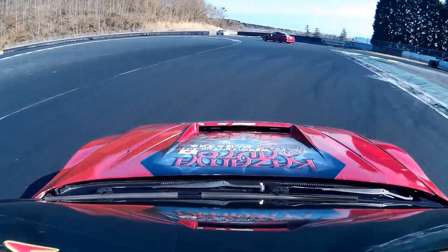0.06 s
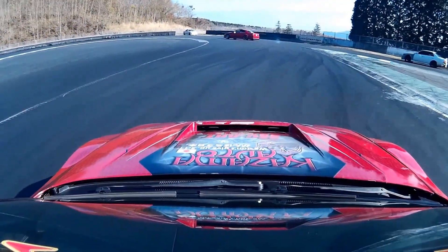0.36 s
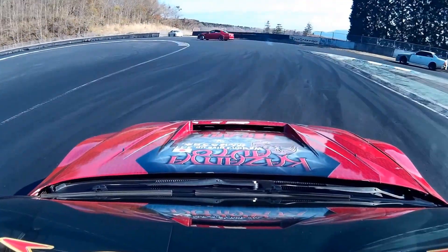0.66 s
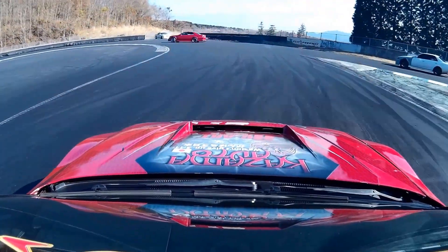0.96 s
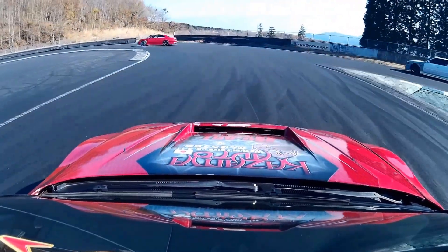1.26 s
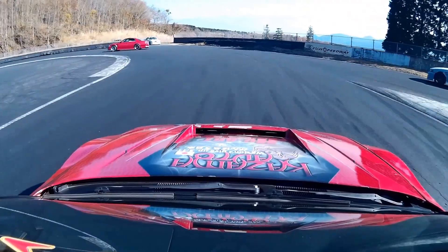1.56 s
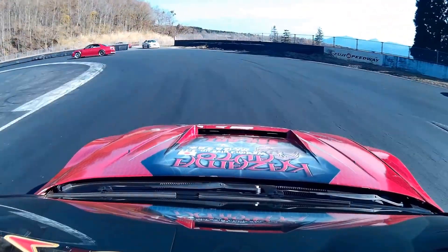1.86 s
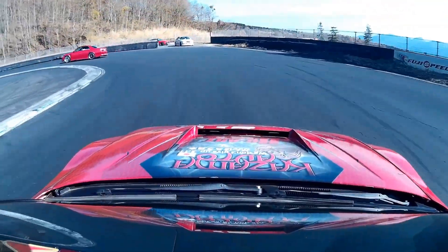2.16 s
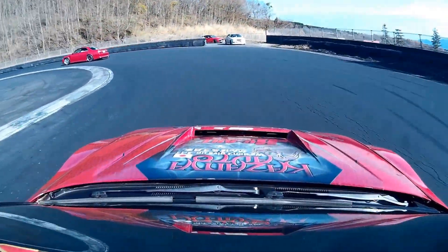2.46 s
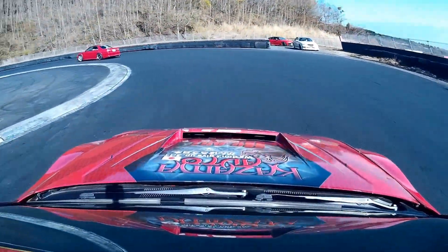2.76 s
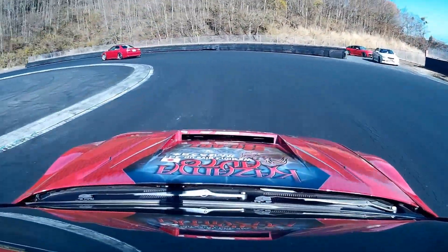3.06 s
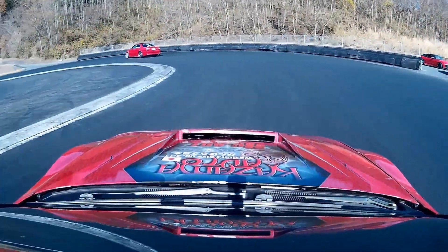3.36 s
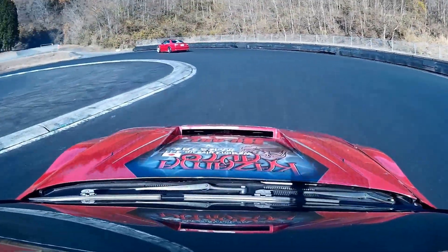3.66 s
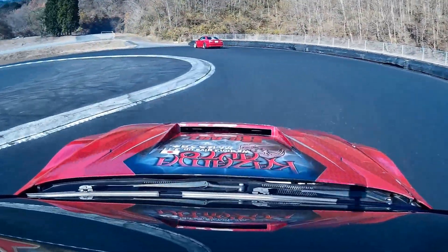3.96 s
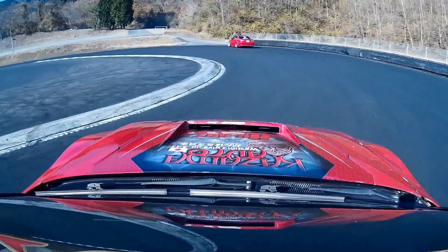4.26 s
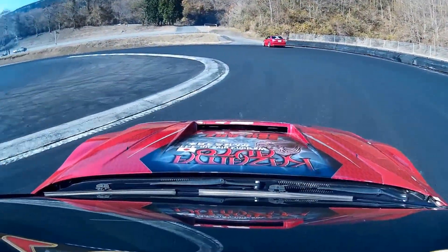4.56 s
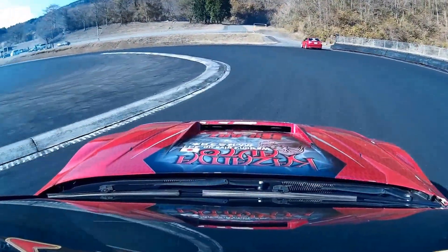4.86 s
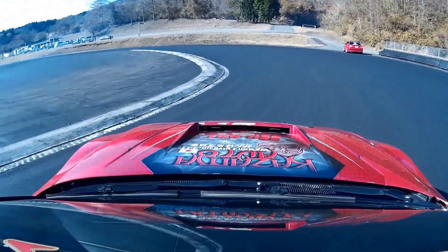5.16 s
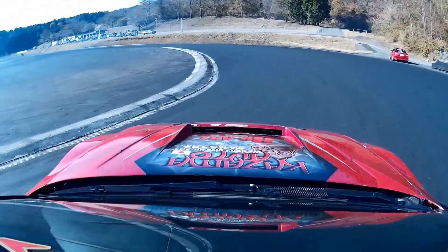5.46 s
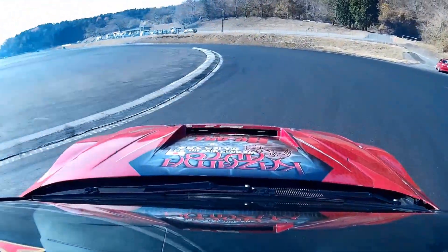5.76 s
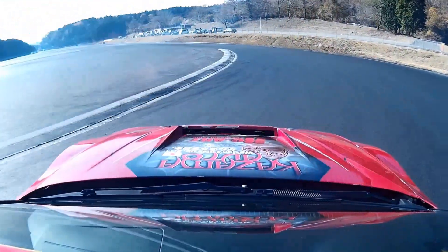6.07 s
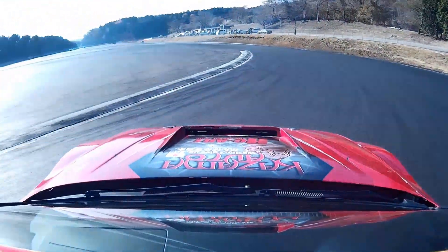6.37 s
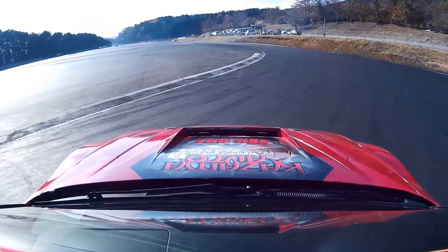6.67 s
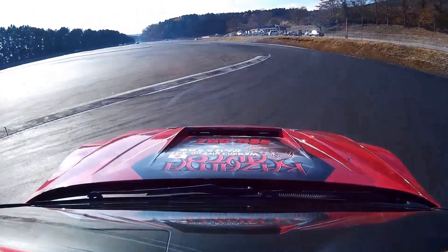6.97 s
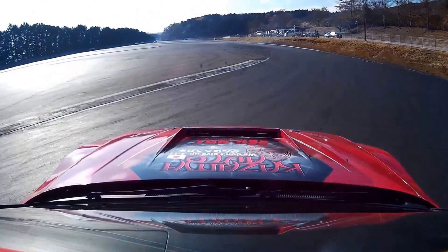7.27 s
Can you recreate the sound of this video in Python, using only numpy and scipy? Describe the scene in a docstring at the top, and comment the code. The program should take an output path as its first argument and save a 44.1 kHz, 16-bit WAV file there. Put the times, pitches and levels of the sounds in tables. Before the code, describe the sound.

From a microphone on the roof of a drifting car, a loud engine growls under rushing, thumping wind. The gusts peak and drop away, leaving the wavering exhaust note, sliding tyres and the brief drone of a second car further along the track. Grit ticks close by now and then. After a short lift with a soft turbo flutter, the engine runs up to high revs and barks at the limiter with a thin whistle.

```python
"""Drifting straight-six, from the roof

A turbocharged car drifts through a long bend, microphone on its roof. Wind beats on the microphone
until the car turns sideways; then the exhaust and scrubbing tyres stand out. The turbo flutters as the
throttle lifts and whistles as the engine runs up to its rev limit. Another car drones further ahead,
grit ticks on the body close by, and the loudest gusts overload the microphone."""
import sys
import numpy as np
from scipy.fft import rfft, irfft, next_fast_len
from scipy.io import wavfile
from scipy.ndimage import uniform_filter1d, map_coordinates

SR = 44100
rng = np.random.default_rng(int(sys.argv[2]) if len(sys.argv) > 2 else 0)


def to_wav(sig):
    """Store sig (one row per channel, or 1-D mono) as 16-bit WAV at the path in sys.argv[1].

    Samples outside -1..1 are clipped; the rate is SR.
    """
    pcm = np.clip(np.atleast_2d(sig), -1, 1) * 32767
    pcm = np.round(pcm).astype(np.int16)
    wavfile.write(sys.argv[1], SR, pcm.T)  # frames by channels


N = 322371
TIME_S = np.arange(N) / SR
STRONG_HARMONICS = 5  # of the firing rate


def amp(db):
    """Decibels to gain."""
    return 10 ** (np.asarray(db) / 20)


def unit(x):
    """Scale to rms 1."""
    return x / np.sqrt(np.mean(x ** 2) + 1e-20)


def along(points, hz):
    """Read (Hz, value) points on a log frequency axis."""
    point_hz, values = np.transpose(points)
    return np.interp(np.log(hz + 1), np.log(point_hz + 1), values)


def curves(rows):
    """One value per sample for each column after the time."""
    times, *columns = np.transpose(rows)
    return [np.interp(TIME_S, times, column) for column in columns]


def during(rows):
    """1 while a table lasts, with soft edges."""
    active = (TIME_S >= rows[0][0]) & (TIME_S <= rows[-1][0])
    return uniform_filter1d(active * 1., size=2000)


def swell(centre_s, width_s):
    """A bell-shaped burst of height 1."""
    return np.exp(-.5 * np.minimum(((TIME_S - centre_s) / width_s) ** 2, 100))


def spell(start_s, end_s, rise_s=0.013, fall_s=0.061):
    """1 between two times, with ramps as long as the throttle's travel."""
    return np.clip(np.minimum((TIME_S - start_s) / rise_s, (end_s - TIME_S) / fall_s) + .5, 0, 1)


def wobble(rate):
    """A smooth random curve of rms near 1, with rate knots a second."""
    knots = rng.standard_normal(4096)
    coarse = np.arange(0, N, step=32)
    return np.interp(np.arange(N), coarse, map_coordinates(knots, [coarse * rate / SR], mode="wrap"))


def filtered(x, response):
    """Filter x by a gain given as a function of frequency."""
    size = next_fast_len(N + SR // 4)
    return irfft(rfft(x, size) * response(np.fft.rfftfreq(size, 1 / SR)), size)[:N]


def noise(spectrum):
    """Coloured noise of rms 1."""
    return unit(filtered(rng.standard_normal(N), lambda hz: amp(along(spectrum, hz))))


def angle(hz):
    """Running phase of a frequency curve."""
    return 2 * np.pi * np.cumsum(hz) / SR


def wind(slap_width_s=.005, gust_rush_db=-10):
    """Eddies thump the microphone while the airstream rushes over the roof and slaps in bursts."""
    # airstream, dropping as the car turns sideways: time_s, buffet_db, rush_db
    airstream = [(0, -27, -11), (.55, -37, -14), (.85, -18, -10), (1.5, -25, -13), (1.92, -12, -7.5),
                 (2.08, -16, -12), (2.2, -18, -9), (2.52, -16, -14.5), (2.68, -10.5, -15),
                 (2.78, -22, -20.5), (3.55, -21, -23.5), (4.7, -21.5, -27), (5.3, -22, -25.5),
                 (5.75, -25.5, -19.5), (6.1, -25, -22.5), (6.7, -20, -18.5), (7.31, -22, -15)]
    # gusts on the microphone: centre_s, half_width_s, level_db
    gust_bursts = [(.1, 0.038, -22), (.35, 0.022, -11.5), (1.88, 0.016, -17), (2.17, 0.029, -14),
                   (2.27, 0.027, -14), (2.44, .018, -1.5), (2.65, .014, -11), (2.695, 0.014, -6.5),
                   (3.41, 0.016, -20), (3.53, 0.023, -12), (4.17, 0.01, -11.5), (4.87, 0.014, -18.5),
                   (5.46, 0.038, -15), (5.98, 0.053, -18.5), (6.55, 0.028, -24)]
    # hard slaps of air: centre_s, level_db
    air_slaps = [(1.778, -9), (1.889, -6.5), (1.937, -10), (1.98, -11.5), (2.152, -10), (2.166, -8),
                 (2.249, -9), (2.355, -5), (2.365, -7), (2.437, -11.5), (2.698, -14)]
    # spectra of the buffeting and the rush: frequency_hz, relative_db
    buffet_spectrum = [(12, -11), (25, 6.5), (50, 5.5), (100, 3.5), (150, -1), (300, -18), (800, -55.5),
                       (2000, -120)]
    rush_spectrum = [(20, -17), (110, -4), (350, -3), (730, -12.5), (1000, -19.5), (1400, -22.5),
                     (2500, -40), (3900, -43.5), (5900, -61), (7700, -61.5), (9200, -69.5), (10500, -64.5),
                     (12200, -72.5), (14000, -83.5)]
    buffet_db, rush_db = curves(airstream)
    gusts = sum(amp(db) * swell(s, width_s) for s, width_s, db in gust_bursts)
    buffet = unit(amp(0.63 * wobble(22)) * noise(buffet_spectrum))
    buffet *= np.hypot(amp(buffet_db), gusts)
    rush = unit(amp(1.17 * wobble(60) + 0.4 * wobble(10)) * noise(rush_spectrum))
    rush *= np.hypot(amp(rush_db), amp(gust_rush_db) * gusts)
    slaps = sum(amp(db) * swell(s, slap_width_s) for s, db in air_slaps)
    thud = noise([(40, -17), (140, 0), (450, -2), (900, -17), (2500, -55), (6000, -100)])
    return buffet + rush + slaps * thud


def throttle():
    """Engine load lost in the lifts and gained in the stabs, both in dB."""
    # the throttle eases off: start_s, end_s, depth_db
    lifts = [(-0.1, .5, 14.5), (.92, 1.45, 4.5), (2.03, 2.2, 5), (2.728, 2.914, 1.5), (3.272, 3.505, 4),
             (3.716, 3.823, 4.5), (4.01, 4.16, 3), (4.867, 5.304, 3), (5.48, 5.75, 10.5), (5.75, 5.87, 8.5),
             (6.3, 6.72, 1), (7.11, 7.185, 9)]
    # stabs of full throttle: start_s, end_s, extra_load_db
    stabs = [(1.467, 1.525, 2.5), (3.13, 3.243, 2.5), (3.885, 3.975, 2), (4.238, 4.796, 2.5),
             (5.88, 6.255, 3), (6.81, 6.876, 6.5), (6.996, 7.09, 3), (7.215, 7.276, 2.5)]
    return [sum(db * spell(start, end) for start, end, db in rows) for rows in (lifts, stabs)]


def engine(lift_db, stab_db, cruise_hz=185, hop_hz=14, rev_db_per_octave=8.5, waver_db=2.8):
    """Speed and throttle drive the exhaust note, growl, lope, combustion roar and intake."""
    # engine speed: time_s, firing_hz
    revs = [(0, 175.5), (.45, 165.4), (.65, 174.2), (1.0, 164.1), (1.49, 179.1), (1.98, 184.7), (2.45, 161),
            (2.82, 131.3), (2.95, 146.9), (3.05, 170), (3.2, 191), (3.35, 163.5), (3.5, 151.3), (3.67, 179),
            (3.83, 161.7), (3.96, 174), (4.1, 154.6), (4.28, 175.6), (4.6, 194.1), (4.82, 198),
            (5.1, 209.4), (5.42, 229.5), (5.72, 198.5), (5.9, 190.5), (6.07, 182.7), (6.2, 192.2),
            (6.35, 198.6), (6.52, 215.1), (6.65, 214.9), (6.84, 246.4), (7.06, 303), (7.13, 275.6),
            (7.31, 287.4)]
    # how unevenly the cylinders fire under load: time_s, roughness (0-1)
    roughness = [(0, 0.7), (3.1, 0), (4.5, 0), (5.4, 0.4), (5.8, .75), (6.6, 0.3), (7.05, 1)]
    # wheel hop shaking the driveline: time_s, speed_swing (share)
    shudder = [(0, .005), (5.8, .005), (5.92, .024), (6.3, .02), (6.5, .008), (6.9, .016), (7.31, .014)]
    firing_hz, = curves(revs)
    rough, = curves(roughness)
    octaves = np.log2(firing_hz / cruise_hz)
    hop = curves(shudder)[0] * np.sin(angle(hop_hz * (1 + 0.151 * wobble(6))))
    firing_phase = angle(firing_hz * (1 + hop + .003 * wobble(25)))
    drive_db = rev_db_per_octave * octaves + waver_db * rough * wobble(11)
    growl_db = -31 + 4.5 * octaves + 0.64 * (stab_db - lift_db) + 2 * rough
    loping = lope(firing_phase)
    shaken_phase = firing_phase + (.05 + .15 * rough ** 2) * wobble(70)
    return (loping + exhaust(firing_phase, firing_hz, rough, drive_db, lift_db, stab_db)
            + growl(shaken_phase, firing_hz, growl_db)
            + roar(firing_phase, octaves, lift_db, stab_db))


def lope(firing_phase):
    """In spells the cylinders lope, twice a crank turn."""
    # loping spells: start_s, end_s, level_db
    lopes = [(-0.1, .15, -18), (.45, 1.0, -13), (7.08, 7.4, -14.5)]
    level = sum(amp(db) * spell(start, end) for start, end, db in lopes)
    return level * amp(1.5 * wobble(20)) * np.sin(firing_phase * 2 / 3)


def exhaust(firing_phase, firing_hz, rough, drive_db, lift_db, stab_db, flicker_db=1.64):
    """Firing harmonics boom at the pipe's resonances; early and late pulses blur the high ones most."""
    # exhaust resonances: frequency_hz, level_db
    boom = [(130, -16), (165, -19.5), (188, -15.5), (198, -18), (217, -28.5), (250, -25.5), (300, -21.5),
            (325, -26.5), (372, -24.5), (392, -34), (420, -30.5), (540, -36.5), (620, -27.5), (680, -27.5),
            (765, -27.5), (830, -38), (950, -39.5), (1200, -46.5)]
    cycle_phase = firing_phase / 6
    jitter = 0.097 * wobble(55) + 0.18 * wobble(150) + 0.072 * np.sin(cycle_phase + .8 * wobble(14))
    phase = firing_phase + rough * jitter
    note = np.zeros(N)
    for k in range(1, STRONG_HARMONICS + 1):
        # lifts dull the note, stabs brighten it
        load_db = stab_db * (1 + 0.068 * (k - 1)) - lift_db * (1 + .15 * (k - 1))
        db = along(boom, k * firing_hz) + drive_db + load_db + flicker_db * wobble(35)
        note += amp(db) * np.sqrt(2) * np.sin(k * phase + rng.uniform(0, 2 * np.pi))
    return note


def growl(firing_phase, firing_hz, level_db, scatter_db=3, crank_db=4, firing_db=7):
    """No two cylinders fire alike: weak lines at every sixth of the firing rate, shaped by the pipe."""
    # exhaust pipe response: frequency_hz, relative_db
    pipe = [(50, -15.5), (130, -9), (240, 9.5), (320, -13), (640, 7), (790, 3.5), (950, -5.5), (1060, -5.5),
            (1300, -15), (1800, -20), (3000, -27)]
    lines = np.zeros(N)
    for k in range(3, 66):
        multiple = k / 6
        on_crank, on_firing = k % 2 == 0, k % 6 == 0
        if on_firing and multiple <= STRONG_HARMONICS:
            continue  # these sound in exhaust()
        pipe_db = along(pipe, multiple * firing_hz[::64]).repeat(64)[:N]
        db = pipe_db + crank_db * on_crank + firing_db * on_firing + scatter_db * wobble(8)
        lines += amp(db) * np.sin(multiple * firing_phase + rng.uniform(0, 2 * np.pi))
    return amp(level_db) * unit(lines)


def roar(firing_phase, octaves, lift_db, stab_db, cruise_db=-31.5, db_per_octave=1):
    """Combustion noise and the intake both pulse with the firings and the crank."""
    # barks of combustion, the last two at the rev limit: centre_s, half_width_s, level_db
    hard_barks = [(6.508, .015, -21), (6.97, .06, -23.5), (7.068, .022, -17), (7.247, .02, -15)]
    # combustion spectrum: frequency_hz, relative_db
    rasp = [(20, -43.5), (150, -19), (300, -10), (750, 7), (1100, 2.5), (1500, 0), (2100, -9.5),
            (3700, -20.5), (5000, -35), (6200, -44.5), (8000, -42.5), (9500, -46.5), (15000, -55.5),
            (18000, -75)]
    crank_phase = firing_phase / 3
    pulsing = amp(1.3 * np.sin(firing_phase) + np.sin(crank_phase) + 1.8 * wobble(40))
    barks = sum(amp(db) * swell(s, width_s) for s, width_s, db in hard_barks)
    burn = amp(cruise_db + db_per_octave * octaves - 0.38 * lift_db)
    combustion = np.hypot(burn, barks) * unit(pulsing * noise(rasp))
    return combustion + intake(pulsing, lift_db, stab_db)


def intake(pulsing, lift_db, stab_db, over_hiss_db=15.5, airbox_hz=8000):
    """Pulsing air rings the intake pipe, and the airbox muffles its top."""
    # intake pipe resonances: centre_hz, width_hz, relative_db
    resonances = [(1790, 190, 9.5), (2360, 210, 4), (2820, 120, -2), (3200, 88, 0.5), (4120, 160, -8),
                  (5050, 450, -11), (7700, 1400, -22)]

    def response(hz):
        power = sum(amp(db) ** 2 / (1 + ((hz - centre) / (width / 2)) ** 2)
                    for centre, width, db in resonances)
        return np.sqrt(power) / (1 + (hz / airbox_hz) ** 6)

    air = unit(filtered(pulsing * rng.standard_normal(N), response))
    return amp(boost(lift_db) + 0.32 * stab_db + over_hiss_db) * air


def boost(lift_db, sag_share=0.7):
    """Level of the compressor's air flow in dB; it sags in every lift."""
    # air through the compressor at open throttle: time_s, level_db
    airflow = [(0, -74.5), (3, -77.5), (4.6, -75), (5.38, -61), (5.95, -62.5), (6.4, -55), (6.8, -57),
               (7.06, -48.5), (7.25, -49.5), (7.31, -53)]
    return curves(airflow)[0] - sag_share * lift_db


def turbo(lift_db, puff_width_s=0.0089):
    """Hiss that grows with boost, a flutter of surge puffs, and the whistle of the blades."""
    # compressor surge puffs: centre_s, level_db
    flutter = [(5.433, -55), (5.504, -54), (5.57, -55.5), (5.634, -55.5), (5.88, -54.5)]
    # compressor hiss spectrum: frequency_hz, relative_db
    hiss_spectrum = [(3000, -32), (5000, 1), (8000, -4.5), (9500, -12.5), (10400, 3.5), (11800, 2.5),
                     (13200, -27), (15500, -23)]
    # turbine whistle: time_s, pitch_hz, level_db
    blade_tone = [(6.66, 10060, -78), (6.71, 10220, -60.5), (6.82, 11300, -56.5), (6.92, 12200, -60),
                  (7.07, 13300, -68), (7.18, 12780, -62), (7.31, 12950, -63.5)]
    puffs = sum(amp(db) * swell(s, puff_width_s) for s, db in flutter)
    hiss = (amp(boost(lift_db)) + puffs) * noise(hiss_spectrum)
    pitch_hz, level_db = curves(blade_tone)
    level = amp(level_db + 3.44 * wobble(50)) * during(blade_tone)
    whistle = level * np.sin(angle(pitch_hz * (1 + .02 * wobble(1100))))
    return hiss + whistle


def squeal(slide):
    """Sliding tread chatters in a few wide resonances that follow the squeal pitch."""
    # tread resonances: pitch_multiple, width_hz, relative_db
    tread = [(1, 178, 0.5), (1.15, 168, -3.5), (1.98, 360, -13)]

    def chatter(cutoff_hz):
        return unit(filtered(rng.standard_normal(N), lambda hz: 1 / (1 + (hz / cutoff_hz) ** 4) ** .5))

    level_db, pitch_hz = curves(slide)
    phase = angle(pitch_hz * (1 + .014 * wobble(25)))
    scrub = np.zeros(N)
    for multiple, width_hz, db in tread:
        scrub += amp(db) * chatter(width_hz / 2) * np.sin(multiple * phase)
        scrub += amp(db) * chatter(width_hz / 2) * np.cos(multiple * phase)
    return amp(level_db + 1.4 * wobble(24)) * during(slide) * unit(scrub)


def tyres():
    """The rear tyres scrub sideways, and the inner one climbs in pitch as it spins up."""
    # rear tyres sliding, inner tyre spinning: time_s, level_db, pitch_hz
    rear_slide = [(0, -27.5, 1202), (2.5, -43.5, 1216), (2.9, -31, 1198), (4.3, -29, 1220),
                  (4.9, -33, 1301), (5.35, -34.5, 1311), (5.6, -27, 1192), (5.82, -28.5, 1153),
                  (5.92, -38, 1172)]
    inner_spin = [(4.3, -57, 1371), (4.7, -45, 1473), (5.0, -38, 1555), (5.2, -42.5, 1667),
                  (5.42, -51, 1723), (5.52, -37, 1830)]
    return squeal(rear_slide) + squeal(inner_spin)


def grit(t60_s=0.017):
    """Small stones tick against the panels below the microphone."""
    # stones hitting the body: start_s, level_db
    hits = [(0.1675, -26.5), (3.4336, -39.5), (4.0814, -44), (5.9617, -39.5), (5.9813, -45)]
    # spectrum of a tick: frequency_hz, relative_db
    tick_spectrum = [(500, -11.5), (1200, 1), (2500, -3.5), (3900, 16.5), (5500, -5), (7500, 1),
                     (9000, -14.5), (11000, -8.5), (13000, -39), (16000, -39)]
    blows = sum(amp(db - 60 * np.abs(TIME_S - s) / t60_s) * (TIME_S >= s) for s, db in hits)
    return blows * noise(tick_spectrum)


def car_ahead(harmonics_db=(-1.5, -15, -4, -5.5, -12.5)):
    """Another engine's firing harmonics drone thinly from across the bend."""
    # the leading car: time_s, firing_hz, level_db
    leader = [(2.4, 157, -52), (2.6, 156.3, -17), (2.75, 158.4, -23.5), (2.88, 157.8, -20),
              (3.05, 157.6, -23), (3.3, 164.1, -21.5), (3.42, 162.1, -24), (3.55, 161.1, -57)]
    firing_hz, level_db = curves(leader)
    phase = angle(firing_hz)
    drone = sum(amp(db + 2.9 * wobble(14)) * np.sin(k * phase) for k, db in enumerate(harmonics_db, 1))
    return amp(level_db) * during(leader) * drone


def scene():
    """Everything that reaches the one microphone on the roof."""
    lift_db, stab_db = throttle()
    return (engine(lift_db, stab_db) + turbo(lift_db) + car_ahead() + wind() + tyres() + grit())[None]


def record(dry, top_hz=15700):
    """The loudest peaks clip at full scale and crackle; treble above the band limit is cut."""
    return filtered(np.clip(dry[0], -1, 1), lambda hz: hz < top_hz)[None]


dry = scene()
out = record(dry)
to_wav(out)
```